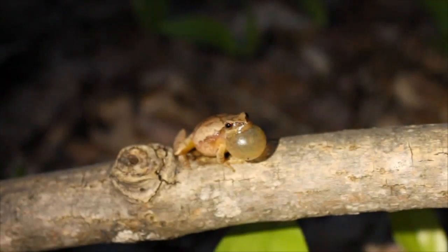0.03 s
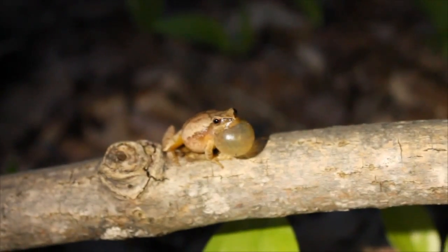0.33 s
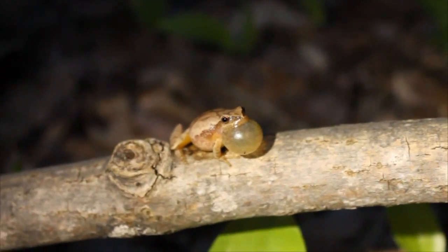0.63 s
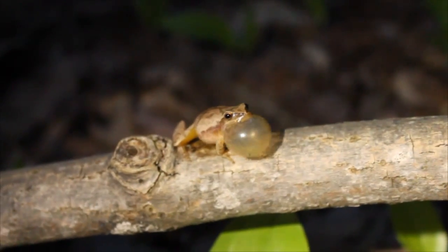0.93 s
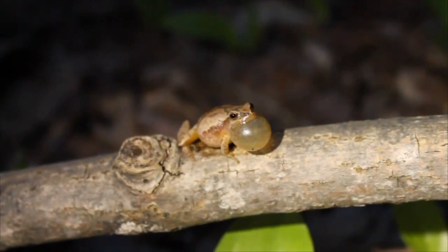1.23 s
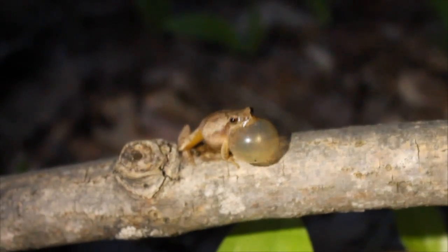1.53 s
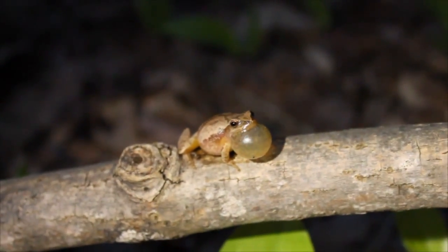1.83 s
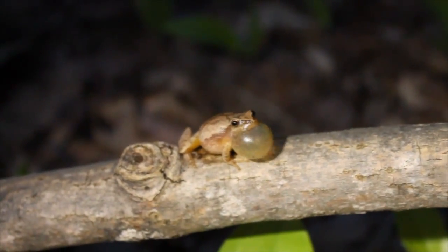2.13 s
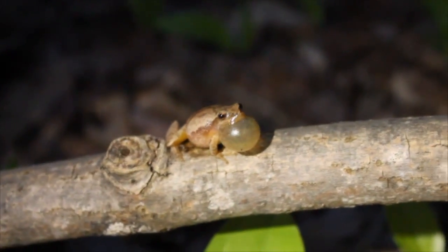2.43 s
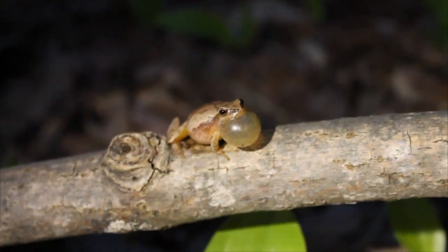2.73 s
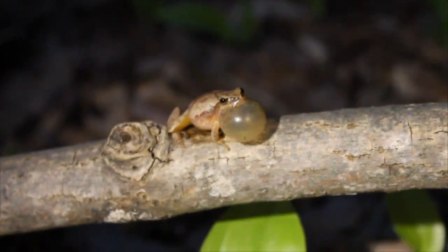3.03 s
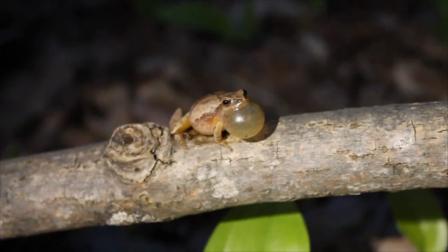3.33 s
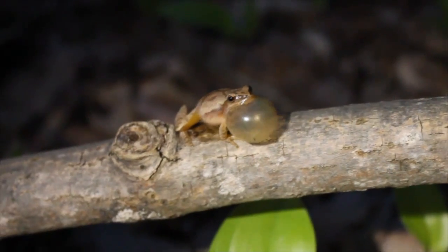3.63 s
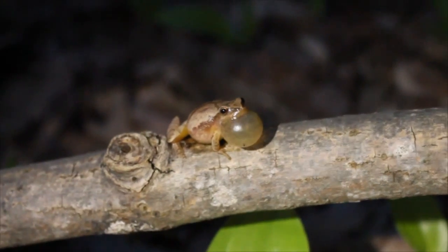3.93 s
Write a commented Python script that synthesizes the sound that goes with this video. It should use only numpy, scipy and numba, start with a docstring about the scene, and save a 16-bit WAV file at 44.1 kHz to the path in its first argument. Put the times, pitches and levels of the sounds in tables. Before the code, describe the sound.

High, rising peeps from one nearby frog stand out against many others calling at night.

```python
"""Spring peepers at night

A spring peeper on a branch, close to the microphone, gives seven rising whistled peeps: a larynx tone
whose second harmonic the vocal sac picks out. Neighbours peep a few metres off, over a dense far chorus,
the echo of the trees and the night air; a low rumble swells and fades late on. Each close peep
overloads the recorder's limiter, which ducks everything else for a moment. Mono."""
import sys
import numpy as np
from scipy import signal
from scipy.fft import rfft, irfft, next_fast_len
from scipy.io import wavfile
from scipy.ndimage import minimum_filter1d, map_coordinates
from numba import njit

SR = 44100
rng = np.random.default_rng(int(sys.argv[2]) if len(sys.argv) > 2 else 0)


def unload_audio(sound):
    """Save the sound as a 16-bit wav file, at the path given as the first command line argument."""
    columns = np.transpose(np.atleast_2d(sound))
    # keep every value between -1 and 1, then stretch to whole-number steps
    steps = np.round(np.clip(columns, -1, 1) * 32767)
    wavfile.write(sys.argv[1], SR, steps.astype(np.int16))


N = 176400

# Levels in the tables are relative. A peep's pitch is that of its loud second harmonic.
# the close frog's peeps: start_s, length_s, level_db, closing_ring_db
CLOSE_PEEPS = [(0.2206, 0.087, -4.5, -13), (.9075, .081, -3, -10.5), (1.5175, 0.09, -4.5, -14),
               (2.0253, 0.096, -6.5, -15.5), (2.586, 0.0954, -4.5, -20), (3.0858, 0.0964, -4.5, -23.5),
               (3.649, 0.093, -2, -12.5)]
# the close frog's harmonics, from the fundamental up: level_db
CLOSE_HARMONICS = [-37.5, 1.5, -29, -40, -48, -53, -64]
# peeps a few metres off: start_s, length_s, start_pitch_hz, rise_hz, level_db, seventh_harmonic_lift_db
NEIGHBOUR_PEEPS = [(0.0, 0.11, 3480.0, 157, -46, 9), (0.0, 0.11, 2920.0, 196, -39, 2),
                   (0.086, 0.091, 2913, 161, -26.5, 21), (0.129, 0.036, 3660, 206, -32.5, 0.0),
                   (0.143, 0.083, 3233, 235.3, -15, -2), (0.164, 0.063, 3640, 203, -25, 2),
                   (0.325, 0.064, 3574, 155, -33, 6), (0.347, 0.12, 2963, 234.7, -19.5, 6),
                   (0.371, 0.1, 3214, 157.2, -20, -1), (0.469, 0.11, 3356, 231, -20, 15),
                   (0.546, 0.1, 3144.0, 150.7, -19.5, -5), (0.572, 0.09, 2900.0, 193, -22, 21),
                   (0.612, 0.058, 2900, 228, -14.5, 3), (0.68, 0.19, 2397, 308, -43, -3),
                   (0.717, 0.091, 3105, 191.6, -17.5, -4), (0.736, 0.078, 3713, 211, -24.5, 0.0),
                   (0.796, 0.077, 3255, 231, -12.5, -4), (0.8, 0.17, 2994, 193.5, -18, 1),
                   (0.861, 0.06, 3728.0, 206, -31, -1), (1.04, 0.13, 2538, 233, -39, 0.5),
                   (1.041, 0.093, 3031.0, 193.5, -17.5, -2), (1.045, 0.077, 3375, 153, -24.5, -5),
                   (1.101, 0.09, 2927.0, 192, -20, 18), (1.141, 0.11, 2922, 242.4, -20, 0.0),
                   (1.247, 0.071, 3175, 109.4, -15, -2.5), (1.245, 0.078, 3295, 239.5, -17.5, -2),
                   (1.33, 0.064, 3600, 137, -27, 2), (1.327, 0.08, 2977, 192.2, -19.5, 0.0),
                   (1.404, 0.099, 3276, 232.5, -14.0, -0.5), (1.412, 0.11, 2916.0, 233, -17.5, -1),
                   (1.655, 0.074, 3684, 196, -28, -5), (1.655, 0.079, 3057, 150.0, -16, -7),
                   (1.66, 0.11, 3284, 220.8, -25.5, 1), (1.672, 0.079, 2890, 229.8, -15.5, 1.5),
                   (1.797, 0.082, 2890, 188.5, -20.5, 21), (1.815, 0.095, 3113, 232, -18.5, -2.5),
                   (1.92, 0.11, 3450, 182.3, -29, 1.5), (2.174, 0.074, 3715, 216.6, -34.5, 7),
                   (2.18, 0.13, 3200, 228.8, -17.5, 0.5), (2.205, 0.08, 3240, 233, -16, -9),
                   (2.327, 0.073, 3025.0, 193, -15.5, 3), (2.33, 0.09, 2917.0, 188, -22, 19.5),
                   (2.372, 0.093, 3207, 109.8, -16, -7), (2.446, 0.08, 3690, 131.6, -36, 0.0),
                   (2.46, 0.095, 3363, 193.3, -19.5, -2.5), (2.47, 0.11, 2470, 111, -44, -1),
                   (2.487, 0.055, 3746, 176, -24.5, 0.0), (2.735, 0.08, 2976, 191, -16, -3),
                   (2.805, 0.056, 2912, 182, -21, 0.5), (2.799, 0.068, 3650, 210.0, -33.5, -5),
                   (2.838, 0.1, 3160, 241, -16.0, 1.5), (2.858, 0.093, 2958, 195, -23, 22.5),
                   (2.898, 0.11, 3128, 223.4, -22.5, 0.5), (3.004, 0.11, 3195.0, 188.3, -19, -1),
                   (3.221, 0.11, 3002, 193, -20, -7), (3.247, 0.07, 3293, 157.6, -14, 5),
                   (3.373, 0.064, 3580, 177, -24.5, -6), (3.408, 0.064, 3004.0, 193, -14.5, 4),
                   (3.464, 0.099, 3746, 197, -33, 0.0), (3.49, 0.1, 3117.0, 190.0, -21.5, -4.5),
                   (3.55, 0.058, 2870, 230.0, -17.5, -1.5), (3.547, 0.069, 2913, 190.4, -25.5, 28),
                   (3.551, 0.11, 3000, 190.8, -20.0, -7.5), (3.855, 0.094, 3245, 229.4, -12.5, -5),
                   (3.95, 0.07, 3038, 179.6, -15, -8)]
# harmonics of the neighbours and the chorus, from the fundamental up: level_db
DISTANT_HARMONICS = [-38, 2.5, -30, -38.5, -45.5, -49.5, -56]
# the farthest frogs, blurred into one band: frequency_hz, density_db
HAZE_SPECTRUM = [(1000, -93.5), (2200, -47.5), (2550, -26.5), (2750, -14.5), (2950, -1), (3200, 2.5),
                 (3450, -3.5), (3650, -10.5), (3850, -25), (4100, -41.5), (6000, -88.5)]
# the low rumble: frequency_hz, density_db
RUMBLE_SPECTRUM = [(20, -50.5), (50, -25.5), (80, -7), (160, 1.5), (260, -7), (500, -14.5), (1000, -16.5),
                   (2000, -27), (5000, -43), (12000, -74.5)]
# the night air: frequency_hz, density_db
AIR_SPECTRUM = [(20, -13.5), (60, -10.5), (130, -6.5), (220, -6.5), (400, -11.5), (1000, -10.5), (2200, -5),
                (4200, -3.5), (4800, -10), (8000, -24.5), (12000, -32.5)]


def close_frog(snap_db=-6, shut_db=2.5):
    """The frog at the microphone: its larynx snaps open, whistles, and shuts with a short low ring."""
    out = np.zeros(N)
    for start_s, length_s, level_db, closing_db in CLOSE_PEEPS:
        add(out, start_s, amp(level_db) * close_peep(length_s))
        add(out, start_s, amp(level_db + snap_db) * ring(hz=2690, t60_s=0.013))
        add(out, start_s + length_s - 0.002, amp(closing_db + shut_db) * ring(hz=2120, t60_s=0.019))
    return out


def close_peep(length_s, start_hz=3011.5, rise_hz_per_s=3450, settle_s=0.014):
    """One peep from close up: a bright click, and a whistle that holds its pitch, then climbs."""
    attack_s, swell_s, release_s = 0.0022, 0.041, 0.007
    t = np.arange(int((length_s + release_s / 2) * SR)) / SR
    jitter_hz = 4 * wobble(t, 220)
    pitch_hz = start_hz + rise_hz_per_s * (t - settle_s * np.tanh(t / settle_s)) + jitter_hz
    shimmer_db = 0.2 * wobble(t, 120)
    swell_db = 9 - 7.5 * (1 - np.clip(t / swell_s, 0, 1)) ** 2 + shimmer_db
    gate = ramp(t / attack_s) * ramp((t[-1] - t) / release_s)
    # all harmonics but the second waver; from the fourth up they bloom in mid-peep
    dull_db = 10.5 * (2 * t / length_s - 1) ** 2
    harmonics_db = [db + (k != 2) * 1.2 * wobble(t, 32) - (k >= 4) * dull_db
                    for k, db in enumerate(CLOSE_HARMONICS, 1)]
    return click(t) + amp(swell_db) * gate * whistle(pitch_hz, harmonics_db)


def whistle(pitch_hz, harmonics_db):
    """A larynx tone whose second harmonic, at pitch_hz, is picked out by the vocal sac."""
    phase = np.pi * np.cumsum(pitch_hz) / SR + rng.uniform(0, 2 * np.pi)
    return sum(amp(db) * np.sin(k * phase) for k, db in enumerate(harmonics_db, 1))


def click(t, band_hz=(2000, 6000), level_db=-20, t60_s=0.013):
    """The bright tick of noise at the front of a close peep."""
    band = signal.butter(2, band_hz, "band", fs=SR, output="sos")
    hiss = signal.sosfilt(band, rng.standard_normal(SR // 2)[:len(t)])
    return amp(level_db - 60 * t / t60_s) * unit(hiss)


def ring(hz, t60_s, rise_s=0.00062):
    """A resonance briefly struck as the larynx opens or shuts."""
    t = np.arange(SR // 20) / SR
    return ramp(t / rise_s) * amp(-60 * t / t60_s) * np.sin(2 * np.pi * hz * t)


def neighbours(trim_db=-1.5):
    """Frogs a few metres from the microphone, the louder peeps standing out of the chorus."""
    out = np.zeros(N)
    for start_s, length_s, start_hz, rise_hz, level_db, lift_db in NEIGHBOUR_PEEPS:
        harmonics_db = distant_timbre(scatter_db=4.5)
        harmonics_db[-1] += lift_db
        add(out, start_s, amp(level_db + trim_db) * distant_peep(length_s, start_hz, rise_hz, harmonics_db))
    return out


def far_chorus(peeps_per_s=120, peep_s=0.11, centre_hz=3073, spread_hz=160, rise_hz=209.56, level_db=-21):
    """Dozens of far frogs, overlapping at random pitches."""
    out = np.zeros(N)
    for slot in range(int(peeps_per_s * (N / SR + peep_s))):
        late, detune, stretch = rng.uniform(-0.9, 1, size=3)
        gain = amp(2.5 * rng.standard_normal())
        harmonics_db = distant_timbre(scatter_db=5)
        start_hz = centre_hz + spread_hz * (np.sqrt(3) * detune + 0.35 * rng.standard_normal())
        peep = distant_peep(peep_s * (1 + 0.25 * stretch), start_hz, rise_hz, harmonics_db)
        add(out, (slot + late) / peeps_per_s - peep_s, gain * peep)
    return amp(level_db) * unit(out)


def distant_timbre(scatter_db):
    """Harmonic levels for one distant peep, all but the second varied at random."""
    return [db + (k != 2) * scatter_db * rng.standard_normal()
            for k, db in enumerate(DISTANT_HARMONICS, 1)]


def distant_peep(length_s, start_hz, rise_hz, harmonics_db, edge=0.19, bend=1.3):
    """A peep from farther off: soft-edged, its climb levelling out at the end."""
    progress = np.linspace(0, 1, int(length_s * SR))
    pitch_hz = start_hz + rise_hz * (1 - (1 - progress) ** bend)
    return ramp(progress / edge) * ramp((1 - progress) / edge) * whistle(pitch_hz, harmonics_db)


def tree_echo(x, t60_s=0.32, build_s=0.028, level_db=-12):
    """The diffuse echo that the trees send back to the microphone."""
    t = np.arange(SR // 2) / SR
    tail = rng.standard_normal(len(t)) * amp(-60 * t / t60_s) * ramp(t / build_s)
    return amp(level_db) * signal.fftconvolve(x, tail / np.linalg.norm(tail))[:N]


def rumble(start_s=2.67, rise_s=0.12, level_db=-33.5, fade_db_per_s=25.5, lumps_db=2):
    """A low rumble that rises quickly and dies away in lumps."""
    t = np.maximum(np.arange(N) / SR - start_s, 0)
    fade_db = level_db - fade_db_per_s * t + lumps_db * wobble(t, 17)
    return ramp(t / rise_s) * amp(fade_db) * noise(RUMBLE_SPECTRUM)


def night_bed(haze_db=-27, air_db=-47.5):
    """The steady background: a haze of the farthest frogs, and the night air."""
    return amp(haze_db) * noise(HAZE_SPECTRUM) + amp(air_db) * noise(AIR_SPECTRUM)


def amp(db):
    """Decibels to gain."""
    return 10 ** (np.asarray(db) / 20)


def unit(x):
    """Scale to rms 1."""
    return x / np.sqrt(np.mean(x ** 2) + 1e-20)


def ramp(u):
    """A smooth step from 0 to 1."""
    return np.sin(np.pi / 2 * np.clip(u, 0, 1)) ** 2


def add(track, start_s, sound):
    """Mix a sound into the track at start_s."""
    offset = int(round(start_s * SR))
    first, end = max(offset, 0), min(offset + len(sound), N)
    if end > first:
        track[first:end] += sound[first - offset:end - offset]


def wobble(t, knots_per_s):
    """A smooth random curve."""
    return map_coordinates(rng.standard_normal(size=64), [t * knots_per_s], mode="mirror")


def filtered(x, response):
    """Filter x by a gain given as a function of frequency."""
    size = next_fast_len(N + SR // 2)
    return irfft(rfft(x, size) * response(np.fft.rfftfreq(size, 1 / SR)), size)[:N]


def noise(spectrum):
    """Noise of rms 1, coloured by rows of frequency_hz, density_db."""
    knots_hz, db = np.transpose(spectrum)
    white = rng.standard_normal(N)
    return unit(filtered(white, lambda hz: amp(np.interp(np.log(hz + 1), np.log(knots_hz), db))))


@njit
def gain_reduction(over_db, attack_s, hold_s, release_db_per_s):
    """The limiter's cut in dB: it follows an overload quickly, holds, then lets go at a steady rate."""
    out = np.zeros(len(over_db))
    cut_db, hold_samples = 0., 0.
    for i, excess_db in enumerate(over_db):
        if excess_db > cut_db:
            cut_db += (excess_db - cut_db) / (attack_s * SR)
        if excess_db > cut_db - 1 and excess_db > 0:
            hold_samples = hold_s * SR * min(cut_db / 12, 1.)  # shallow cuts are held less long
        elif hold_samples > 0:
            hold_samples -= 1
        else:
            cut_db = max(cut_db - release_db_per_s / SR, 0.)
        out[i] = cut_db
    return out


def limiter(x, threshold_db=-7.6, step_db=0.4):
    """The recorder's limiter ducks the whole mix, stepping its gain at zero crossings."""
    peak = -minimum_filter1d(-np.abs(x), size=9)
    over_db = 20 * np.log10(peak + 1e-9) - threshold_db
    cut_db = gain_reduction(over_db, attack_s=0.0011, hold_s=0.022, release_db_per_s=350)
    last_crossing = np.maximum.accumulate(np.arange(N) * (x * np.roll(x, 1) < 0))
    return x * amp(-step_db * np.round(cut_db[last_crossing] / step_db))


def scene(close_echo_db=-22):
    """At the microphone: the close frog almost dry, the others in their echo, the background behind."""
    frog = close_frog()
    others = neighbours() + far_chorus()
    background = night_bed() + rumble()
    echo = tree_echo(others + amp(close_echo_db) * frog)
    return (frog + others + echo + background)[None]


def record(dry, clip_db=-1.5, top_hz=12100):
    """The recorder: a limiter, soft clipping of its overshoot, and a steep treble cut-off."""
    limited = limiter(dry[0])
    clipped = limited / (1 + (limited / amp(clip_db)) ** 8) ** (1 / 8)
    return filtered(clipped, lambda hz: 1 / (1 + (hz / top_hz) ** 120))[None]


dry = scene()
out = record(dry)
unload_audio(out)
```